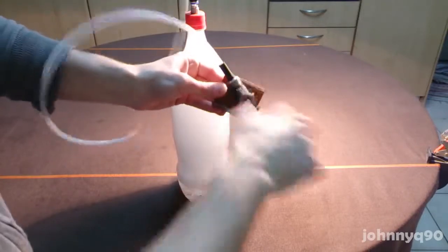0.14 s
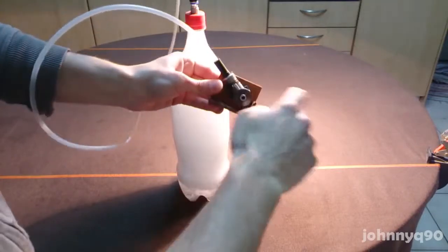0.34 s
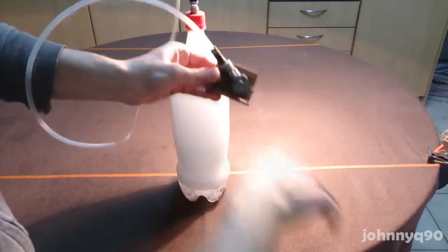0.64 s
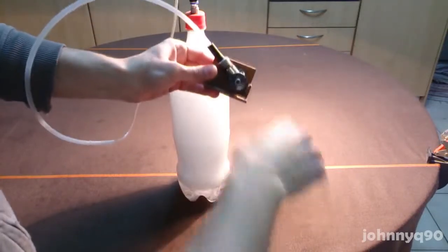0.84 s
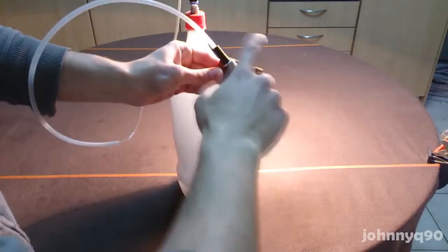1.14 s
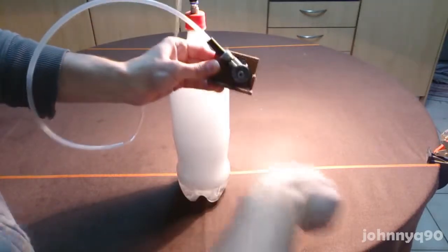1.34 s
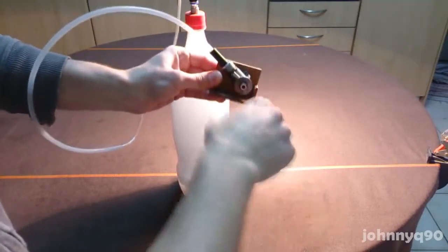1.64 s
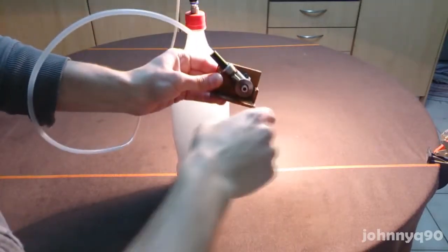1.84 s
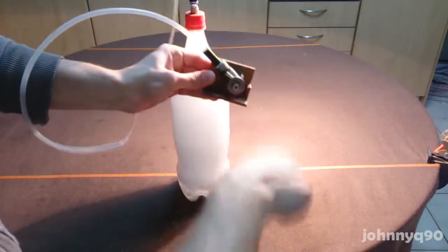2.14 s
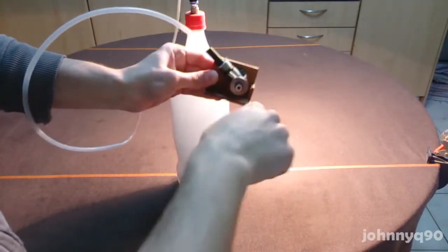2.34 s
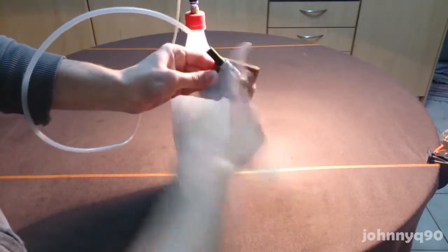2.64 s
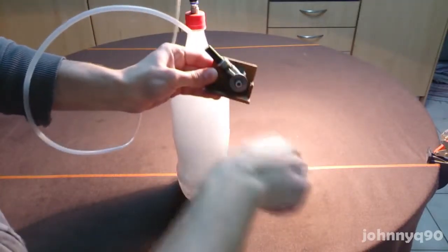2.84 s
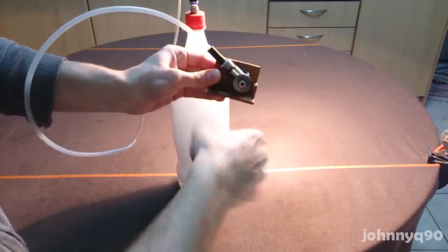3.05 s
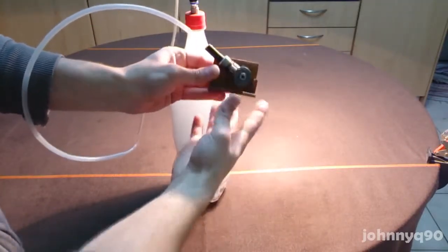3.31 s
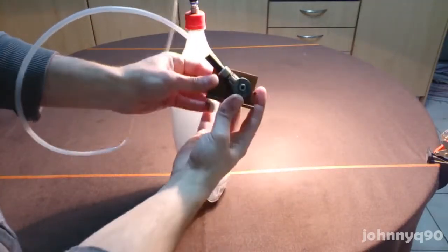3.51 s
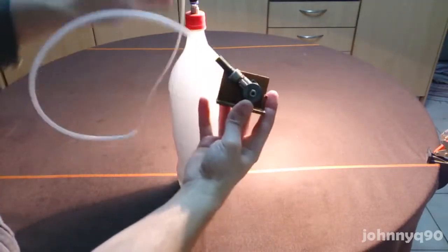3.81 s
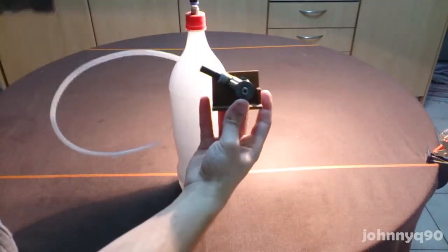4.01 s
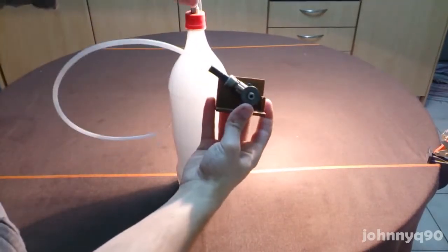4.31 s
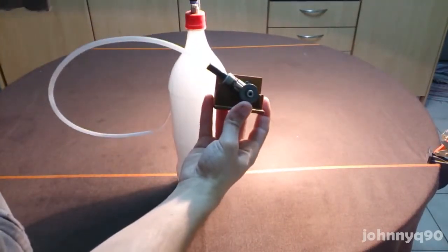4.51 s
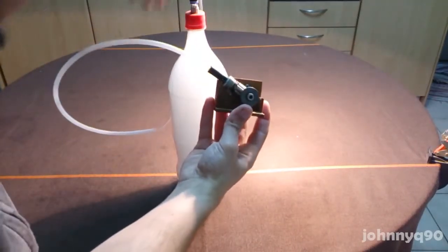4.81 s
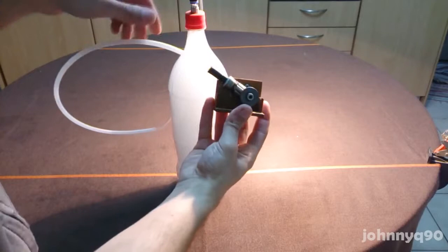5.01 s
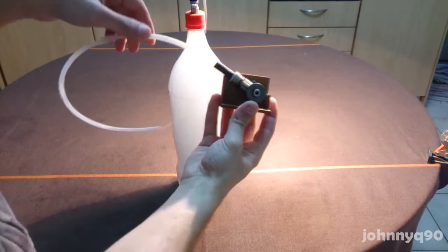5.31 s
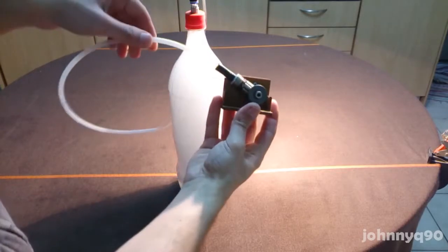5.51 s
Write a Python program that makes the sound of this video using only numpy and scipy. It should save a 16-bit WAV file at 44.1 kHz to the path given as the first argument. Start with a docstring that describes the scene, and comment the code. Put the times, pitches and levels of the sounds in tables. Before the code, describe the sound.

A tiny gas-driven piston engine is flicked over, puffing and stalling several times, then catches and speeds into a rapid buzzing rattle over hissing gas.

```python
"""Gas hisses from leaking fittings throughout, close to a stereo camera in a small room. A cord spins the shaft
of a tiny hand-held piston engine; it coasts and stalls, and is spun again, until the last spin catches and
speeds up. Each turn the exhaust port opens with a pop (a pressure pulse that rings the metal) and a spit of gas
(turbulent noise), then shuts some ms later with a weaker pull. Short ticks and two soft thumps of a hand
fall in between; standing waves and a diffuse echo answer the engine."""
import sys
import numpy as np
from scipy import signal
from scipy.fft import rfft, irfft
from scipy.io import wavfile
from scipy.ndimage import uniform_filter1d

SR = 44100
rng = np.random.default_rng(int(sys.argv[2]) if len(sys.argv) > 2 else 0)


def materialize(psi):
    """Save the field psi as 16-bit PCM at rate SR to the path in sys.argv[1].

    A 1-D psi becomes a single channel; in a 2-D psi each row is a channel.
    """
    bounded = np.clip(np.atleast_2d(psi).T, -1, 1)
    quanta = np.round(bounded * 32767).astype(np.int16)
    wavfile.write(sys.argv[1], SR, quanta)


def linear_from_db(decibels):
    """Turn decibels (scalar or array-like) into linear amplitude factors; 0 gives 1."""
    return 10 ** (np.asarray(decibels, float) / 20)


N = 249606

# spectrum of the low rumble: (frequency [Hz], relative level [dB])
RUMBLE_SPECTRUM = [(25, 2.5), (60, -1), (130, 2), (300, 1), (700, -1), (1500, -5.5)]
RUMBLE_DB = -47
# soft thumps of a hand on the table: (time [s], peak level [dB], frequency [Hz])
HAND_THUMPS = [(1.372, -52, 45), (1.42, -52, 40)]
# standing waves of the room: (frequency [Hz], width [Hz], relative level [dB])
STANDING_WAVES = [(81, 43, -18.5), (142.5, 19, -7.5), (193, 4.9, -12.5), (232.2, 3.7, -3),
                  (293.3, 18, -8.5), (331.6, 6.3, -5), (415.3, 5.8, -10.5), (515.3, 6.2, -2.5),
                  (591, 1.8, -1), (675, 13, -19.5), (859, 14.4, -7), (927, 2.5, -2.5), (1074, 9.3, -8),
                  (1190, 17, -9.5)]
STANDING_WAVES_DB, DIFFUSE_FROM_HZ = 17.5, 510
ROOM_T60_S, ROOM_JET_DB, ROOM_POP_DB = 0.37, -7.5, -4
# course of the leak: (time [s], relative level [dB])
LEAK_LEVEL = [(0.0, -35), (0.42, -39.5), (0.6, -36.5), (1.3, -36.5), (2.1, -34.5), (2.65, -37.5),
              (3.0, -36), (4.4, -37), (4.9, -32), (5.66, -31.5)]
# spectrum of the leak: (frequency [Hz], relative level [dB])
LEAK_SPECTRUM = [(300, -39.5), (800, -8.5), (1500, -8), (2700, 1.5), (4000, 1.5), (7000, -1.5), (10000, 1),
                 (12500, -5), (16000, -15.5)]
# faint tones of the leak: (frequency [Hz], width [Hz], relative level [dB])
LEAK_TONES = [(2740, 270, -20), (3770, 330, -12)]
# metal ticks of cord and crank; the low one at 1.404 s is the port shutting:
# (time [s], relative level [dB], ring frequency [Hz])
SHORT_TICKS = [(0.2754, -35, 1420), (0.28, -30, 2600), (0.528, -30.5, 9130), (0.876, -45, 10100),
               (1.404, -52, 260), (1.4462, -28, 2600), (2.2296, -22, 8000), (2.2373, -33, 1660),
               (2.305, -28.5, 9560)]
# shaft speed, one list per spin of the cord, the last one catches: (time [s], speed [turns/s])
SHAFT_SPEED = [
    [(0.2721, 47.98), (0.2962, 23.06), (0.4611, 21.55), (0.6062, 14.89)],
    [(0.8123, 18.9), (0.9052, 23.15), (1.064, 21.3), (1.2213, 12.67)],
    [(1.4044, 48.78), (1.4513, 21.44), (1.5207, 17.44), (1.6398, 24.04), (1.8374, 22.26), (2.0073, 14.64)],
    [(2.2374, 35.52), (2.554, 15.11), (2.6533, 22.81), (2.8173, 24.52), (2.8202, 31.65), (2.9578, 24.92),
     (3.2027, 20.19), (3.413, 20.52), (3.6623, 24.37), (4.0151, 29.73), (4.5304, 34.48), (5.0827, 37.15),
     (5.66, 37.12)],
]
# strength of the puffs as the gas supply builds: (time [s], jet level [dB], pop level [dB]), both relative
GAS_SUPPLY = [(0.3, -23.5, -24), (0.36, -20.5, -26), (0.8, -21, -24), (1.45, -22.5, -24),
              (1.8, -19.5, -23.5), (2.25, -20.5, -22), (2.5, -18.5, -23), (2.85, -19, -22),
              (3.4, -16.5, -22.5), (4.4, -13.5, -20), (5.66, -13, -20.5)]
# the port shuts sooner at speed
OPEN_MS, OPEN_MS_PER_TURN_S = 14.97, 0.19
# spans in which the shaft coasts; the valve lags, shuts later and pops weaker: (start [s], end [s])
VALVE_LAG = [(0.2, 0.7), (0.769, 1.3), (1.541, 2.1), (2.598, 2.8)]
LAG_MS, LAG_RISE_S, LAG_POP_DB = 8.1, 0.17, -3.5
# above this speed the cord outruns the gas and the cylinder fills less
FILL_TURNS_S, EMPTY_DB_PER_TURN_S = 37.5, -0.81
# the last strokes before a stall die away
STALL_JET_DB, STALL_POP_DB, STALL_TURNS = -3.5, -21, 0.99
# spectrum of the exhaust jet: (frequency [Hz], relative level [dB])
JET_SPECTRUM = [(300, -20), (1000, -14), (2000, -5.5), (4000, 5.5), (7000, 1), (11000, 4.5), (16000, -7)]
# resonances of cylinder and base plate: (frequency [Hz], width [Hz], relative level [dB])
METAL_RESONANCES = [(554, 200, -12), (1330, 390, -18), (1670, 180, -9), (2600, 390, -2)]
# likeness of turbulence at the two ports: (frequency [Hz], coherence [0-1])
PORT_COHERENCE = [(100, 0.65), (400, 0.8), (1000, 0.47), (2000, 0.4), (4000, 0.36), (16000, 0.62)]
# shading of direct sound by the camera body: (frequency [Hz], left minus right level [dB])
DIRECT_SHADOW = [(60, 4), (200, 4), (700, 6), (1500, 7), (3000, 12), (5000, 15), (7000, 17), (10000, 26),
                 (15000, 17)]
# port balance of leak, echo and background; the right port lacks the resonance near 10 kHz:
# (frequency [Hz], left minus right level [dB])
DIFFUSE_BALANCE = [(60, 4.5), (400, 4.5), (2400, 2.5), (4100, 4), (6500, 5), (8500, 3.5), (10100, 26),
                   (12000, -3), (15000, 1)]
RIGHT_LAG_SAMPLES = 4
# microphone cavity resonances: (frequency [Hz], width [Hz], gain [dB])
MIC_CAVITIES = [(4290, 480, 3), (9960, 1050, 9)]
TOP_HZ = 16000


def colour(x, points, gain=linear_from_db):
    """Minimum-phase filtering: folding the cepstrum makes the response through (Hz, value) points causal."""
    hz, value = np.transpose(points)
    log_hz = np.log(np.maximum(np.arange(1025) * SR / 2048, 1))
    cepstrum = irfft(np.log(gain(np.interp(log_hz, np.log(hz), value))))
    cepstrum[1:1024] *= 2
    cepstrum[1025:] = 0
    return signal.fftconvolve(x, irfft(np.exp(rfft(cepstrum))))[:N]


def ring(x, hz, width):
    """Simple resonance: a second-order band-pass with gain 1 at its centre."""
    return signal.lfilter(*signal.iirpeak(hz, hz / width, SR), x)


def resonances(x, table):
    """Superposition: resonances in parallel add up."""
    return sum(linear_from_db(db) * ring(x, hz, width) for hz, width, db in table)


def unit(x):
    """Normalisation to a root-mean-square of 1."""
    return x / np.sqrt(np.mean(x ** 2))


def walk(rate):
    """Random modulation: noise averaged twice over 1/rate seconds wanders smoothly with spread 1."""
    k = max(int(SR / rate), 1)
    return unit(uniform_filter1d(uniform_filter1d(rng.standard_normal(N), k), k))


def turbulence(points):
    """Spatial coherence: coloured noise at two ports shares a part set by frequency."""
    near, other = (unit(colour(rng.standard_normal(N), points)) for _ in range(2))
    shared = colour(near, PORT_COHERENCE, lambda c: np.clip(c, .01, .99))
    apart = colour(other, PORT_COHERENCE, lambda c: np.sqrt(1 - np.clip(c, .01, .99) ** 2))
    return np.array([near, shared + apart])


def balance(pair, points):
    """Interaural-like differences: the right port's spectrum is changed and its sound delayed."""
    right = colour(pair[1], points, lambda db: linear_from_db(-db))
    return np.array([pair[0], np.roll(right, RIGHT_LAG_SAMPLES)])


def rumble():
    """Broadband background: steady coloured noise, partly coherent between the ports."""
    return linear_from_db(RUMBLE_DB) * turbulence(RUMBLE_SPECTRUM)


def thumps(length_s=0.01):
    """Structure-borne sound: soft pushes through the table, sines under a short bell, reach both ports."""
    t = np.arange(N) / SR
    return sum(linear_from_db(db) * np.sin(2 * np.pi * hz * (t - s)) * np.exp(-((t - s) / length_s) ** 2)
               for s, db, hz in HAND_THUMPS)


def standing_waves(steps):
    """Modal response: separate room modes ring in the bass, each favouring one port or the other."""
    ports = linear_from_db(2.0 * rng.standard_normal((len(STANDING_WAVES), 1, 1)) * [[1], [-1]])
    boom = 0
    for k, (hz, width, db) in enumerate(STANDING_WAVES):
        # neighbouring modes swing in opposite sense
        boom = boom + (-1) ** k * linear_from_db(db) * ports[k] * ring(steps, hz, width)
    return linear_from_db(STANDING_WAVES_DB) * boom


def diffuse_echo(x):
    """Diffuse field: a furnished room answers with decaying noise, different at each port."""
    t = np.arange(int(.5 * SR)) / SR
    decay = np.exp(-np.log(1000) * t / ROOM_T60_S)
    tails = rng.standard_normal((2, len(t))) * decay * (t > .0015)
    return np.array([signal.fftconvolve(x, tail / np.linalg.norm(tail))[:N] for tail in tails])


def leak():
    """Jet noise: escaping gas makes wandering turbulent hiss, with narrow resonances as faint tones."""
    level_db = np.interp(np.arange(N) / SR, *np.transpose(LEAK_LEVEL))
    hiss = turbulence(LEAK_SPECTRUM)
    hiss = hiss + 4 * resonances(hiss, LEAK_TONES)
    return linear_from_db(level_db + 1.0 * walk(40)) * hiss


def ticks(damp=2.0, grit=0.89):
    """Impact excitation: each tick is a decaying sine roughened by noise (damp in cycles)."""
    out, t = np.zeros(N), np.arange(400) / SR
    grains = rng.standard_normal((len(SHORT_TICKS), len(t)))
    for (s, db, hz), grain in zip(SHORT_TICKS, grains):
        shape = np.sin(2 * np.pi * hz * t) + grit * ring(grain, hz, 2.04 * hz)
        start = int(s * SR)
        out[start:start + len(t)] += linear_from_db(db + 12) * shape * np.exp(-t / (0.0016 + damp / hz))
    return out


def cycles(jet_scatter_db=1.0, pop_scatter_db=0.17):
    """Phase integration: speed adds up to turns; each whole turn gives (s, jet dB, pop dB, port open ms)."""
    rows = []
    for spin in SHAFT_SPEED:
        s, speed = np.transpose(spin)
        t = np.arange(s[0], s[-1], 1 / SR)
        turns = np.cumsum(np.interp(t, s, speed)) / SR
        count = np.arange(int(turns[-1]) + 1)
        when = np.interp(count, turns, t)
        # the last spin catches and does not stall
        stall = np.exp((count - count[-1]) / STALL_TURNS) * (spin is not SHAFT_SPEED[-1])
        rows.append([when, np.interp(when, s, speed), stall])
    when, speed, stall = np.hstack(rows)
    lag = sum(np.clip((when - a) / LAG_RISE_S, 0, 1) * (when < b) for a, b in VALVE_LAG)
    empty_db = EMPTY_DB_PER_TURN_S * np.maximum(speed - FILL_TURNS_S, 0)
    at, jet_supply_db, pop_supply_db = np.transpose(GAS_SUPPLY)
    chance = rng.standard_normal((len(when), 2)).T
    jet_db = np.interp(when, at, jet_supply_db) + empty_db
    jet_db += STALL_JET_DB * stall ** 2 + jet_scatter_db * chance[0]
    pop_db = np.interp(when, at, pop_supply_db) + empty_db
    pop_db += STALL_POP_DB * stall + LAG_POP_DB * lag + pop_scatter_db * chance[1]
    open_ms = OPEN_MS - OPEN_MS_PER_TURN_S * speed + LAG_MS * lag
    return np.transpose([when, jet_db, pop_db, open_ms])


def exhaust(rows, shut_db=-5, slow_db=1.4, lag_ms=0.12, rise_ms=1.43, spit_ms=2.39, blow_db=-11, blow_ms=14,
            snap_db=-13, burst_db=-10, burst_db_per_ms=1.0, burst_scatter_db=4.0, slack_ms=0.085, soft=0.13):
    """Unsteady outflow: pressure pulses as the port opens and shuts, and the jet strength around them."""
    t_ms = np.arange(N) / SR * 1000
    steps, jet = np.zeros(N), np.zeros(N)
    for (s, jet_db, pop_db, open_ms), chance in zip(rows, rng.standard_normal((len(rows), 4))):
        span = slice(int(s * SR) - 50, int((s + .04) * SR))
        # play in the linkage shifts each opening a little and makes it sharper or softer
        ms = t_ms[span] - s * 1000 - slack_ms * chance[0]
        edge = np.exp(soft * chance[1])
        # the longer the port has been open, the less gas is left to cut off
        left = linear_from_db(-slow_db * (open_ms - 8))
        # the flow starts abruptly (a push) and is cut off again (a pull)
        push = np.exp(-(ms / (0.12 * edge)) ** 2)
        pull = left * linear_from_db(shut_db) * np.exp(-((ms - open_ms) / (0.097 * edge)) ** 2)
        steps[span] += linear_from_db(pop_db) * (push - pull)
        age = np.maximum(ms - lag_ms, 0)
        outflow = np.exp(-age / spit_ms) + linear_from_db(blow_db) * np.exp(-age / blow_ms)
        spit = (1 - np.exp(-age / rise_ms)) * outflow
        fade = np.exp(-np.maximum(ms - open_ms - .6, 0) / 1.2)
        # trapped gas squirts out once more just after the port shuts
        snap = left ** 2 * linear_from_db(snap_db) * np.exp(-((ms - open_ms - .9) / 1.4) ** 2)
        # a short burst of gas peaks about 1.5 ms after the port opens, harder on long openings and by chance
        peak_db = burst_db + burst_db_per_ms * min(open_ms - 8, 4.0) + burst_scatter_db * np.tanh(chance[2])
        burst = linear_from_db(peak_db) * np.exp(-((ms - 1.5 - 0.32 * chance[3]) / 0.65) ** 2)
        jet[span] += linear_from_db(jet_db) * (0.85 * spit * fade + burst + snap)
    return steps, jet


def spits(jet):
    """Jet noise: eddies make the turbulent gas flutter within each puff."""
    return jet * linear_from_db(6 + 1.0 * walk(1200)) * turbulence(JET_SPECTRUM)


def pops(steps, direct_db=5, ring_db=16, cut_hz=300):
    """Monopole radiation: only the change of flow radiates; cylinder and base plate ring on after it."""
    direct = signal.lfilter(*signal.butter(1, cut_hz, "high", fs=SR), steps)
    return linear_from_db(direct_db) * direct + linear_from_db(ring_db) * resonances(steps, METAL_RESONANCES)


def scene():
    """Superposition of direct and diffuse sound: engine, leak and room at the two microphone ports."""
    steps, jet = exhaust(cycles())
    bright, pop = spits(jet) + ticks(), pops(steps)
    # the room answers the bass with standing waves, the treble with a diffuse wash
    high_pass = signal.butter(2, DIFFUSE_FROM_HZ, "high", fs=SR, output="sos")
    upper = signal.sosfilt(high_pass, pop)
    wash = diffuse_echo(linear_from_db(ROOM_JET_DB) * bright[0] + linear_from_db(ROOM_POP_DB) * upper)
    diffuse = leak() + standing_waves(steps) + wash + rumble() + thumps()
    return balance(bright + pop, DIRECT_SHADOW) + balance(diffuse, DIFFUSE_BALANCE)


def band_limit(x):
    """A steep low-pass at the top of the band."""
    return signal.sosfilt(signal.butter(12, 16350, fs=SR, output="sos"), x)


def record(dry):
    """Cavity resonance: the microphone lifts two treble bands; peaks are clipped and the top is cut."""
    lift = sum((linear_from_db(db) - 1) * ring(dry, hz, width) for hz, width, db in MIC_CAVITIES)
    clipped = np.clip(linear_from_db(-1) * (dry + lift), -1, 1)
    low_pass = signal.ellip(8, .2, 60, TOP_HZ, fs=SR, output="sos")
    mix = signal.sosfilt(low_pass, clipped)
    return band_limit(mix)


dry = scene()
out = record(dry)
materialize(out)
```